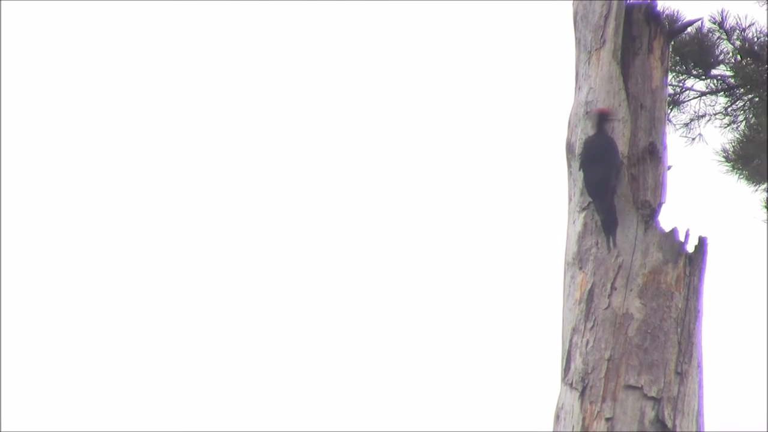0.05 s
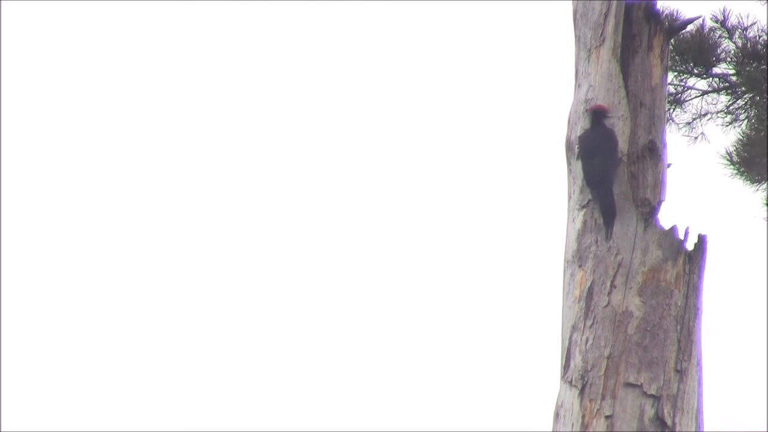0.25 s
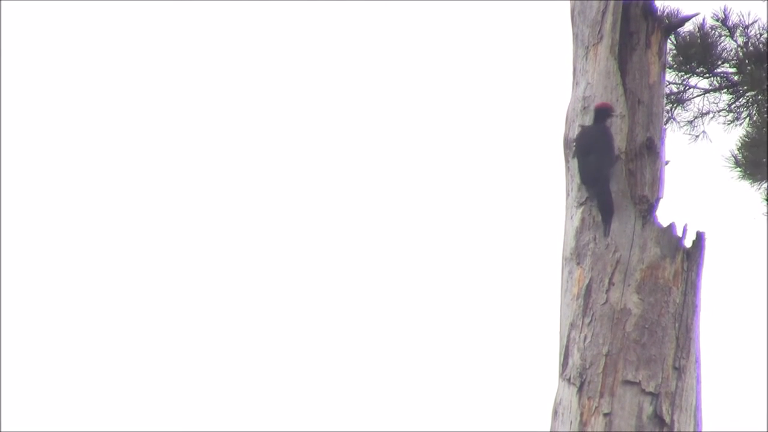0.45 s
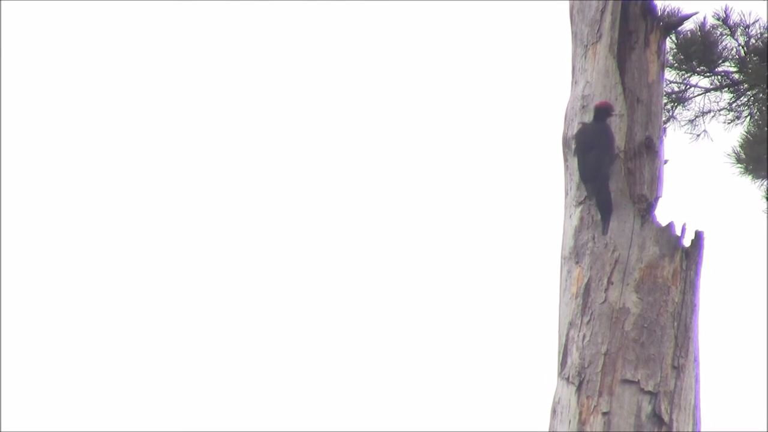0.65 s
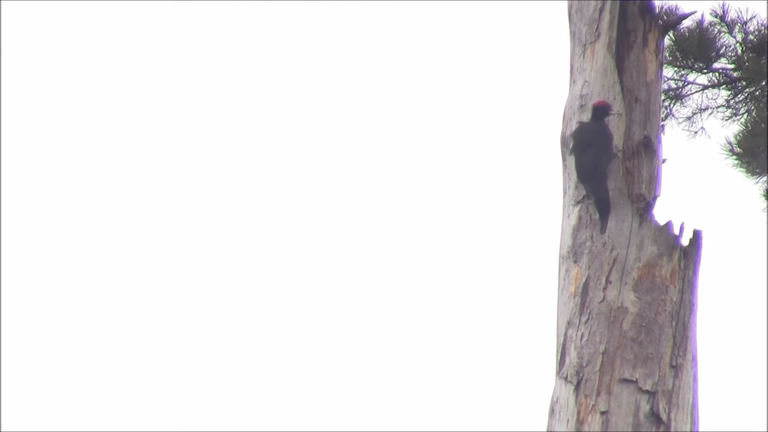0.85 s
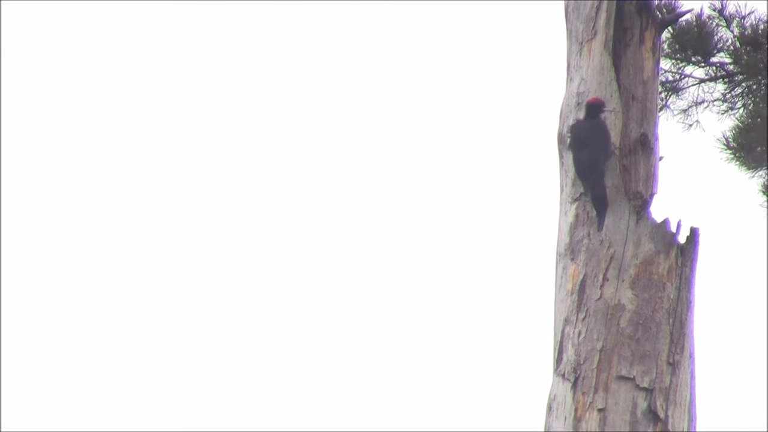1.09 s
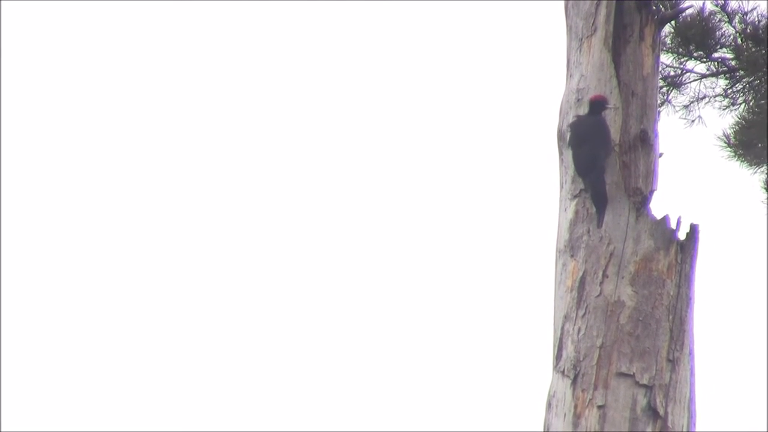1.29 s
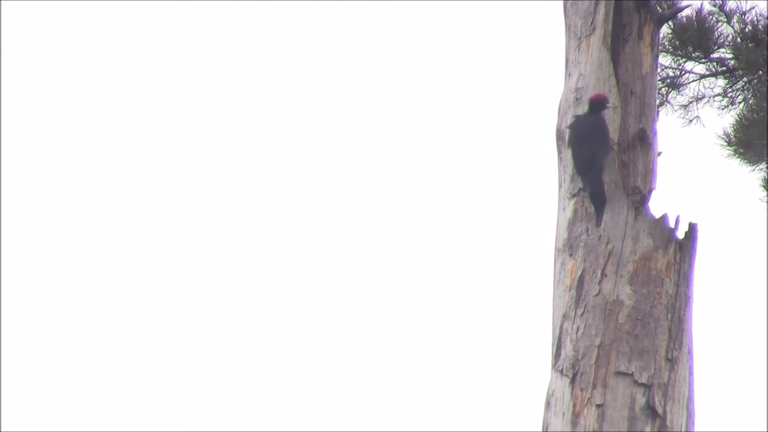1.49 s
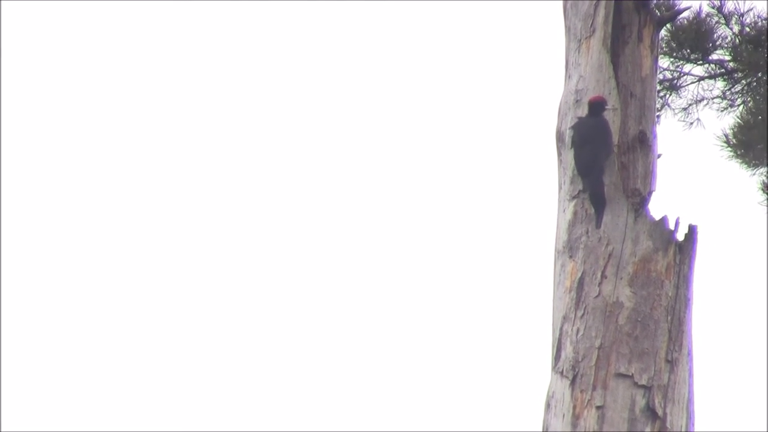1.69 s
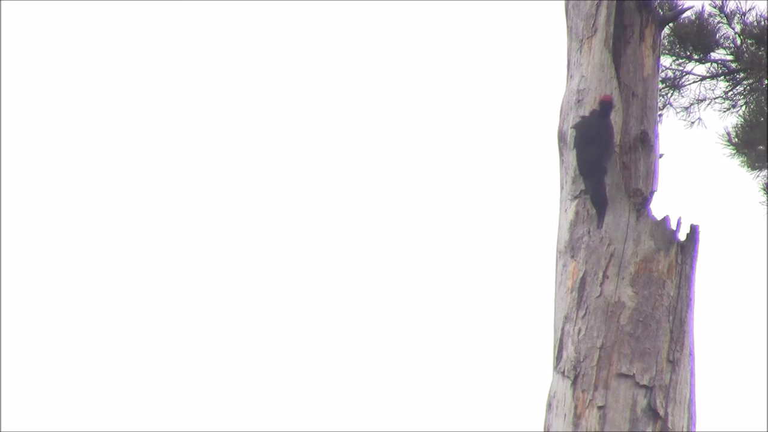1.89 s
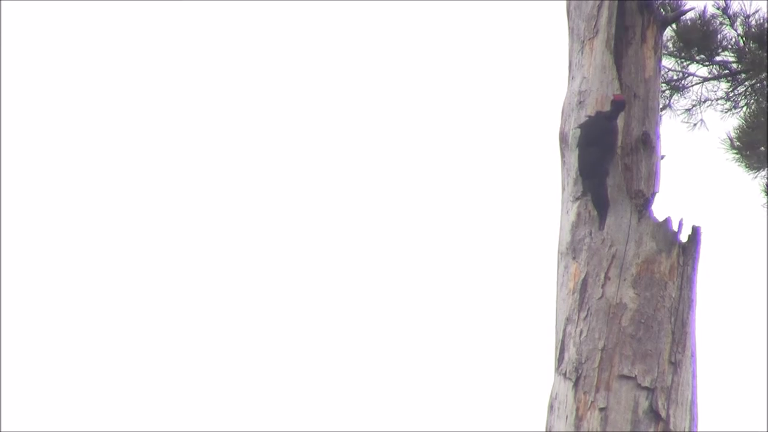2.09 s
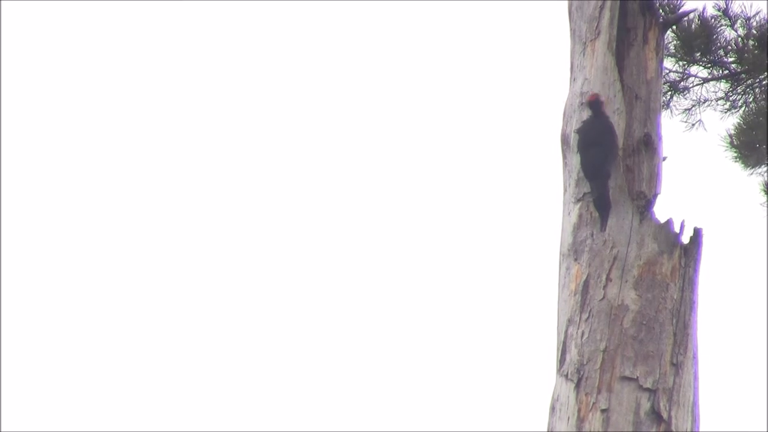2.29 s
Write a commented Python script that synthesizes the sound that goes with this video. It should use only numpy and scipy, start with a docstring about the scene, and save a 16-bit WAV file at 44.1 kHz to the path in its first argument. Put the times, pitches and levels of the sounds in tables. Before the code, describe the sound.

A woodpecker drums one rapid, fading roll on a hollow trunk, with light wind puffs.

```python
"""A woodpecker drums one roll on a dead, hollow trunk: each blow of its bill cracks on the surface
and makes the wood ring. The blows speed up and fade, and the trees echo them.
Gusts flap at the microphone in short, low puffs over a fluttering rumble.
One small tick follows the roll. Behind it all lie a faint forest hush and microphone hiss."""
import sys
import numpy as np
from scipy import signal
from scipy.fft import rfft, irfft, next_fast_len
from scipy.io import wavfile
from scipy.ndimage import uniform_filter1d, minimum_filter1d, map_coordinates

SR = 44100
rng = np.random.default_rng(int(sys.argv[2]) if len(sys.argv) > 2 else 0)


def unload_audio(sound):
    """Save the sound as a 16-bit wav file, at the path given as the first command line argument."""
    columns = np.transpose(np.atleast_2d(sound))
    # keep every value between -1 and 1, then stretch to whole-number steps
    steps = np.round(np.clip(columns, -1, 1) * 32767)
    wavfile.write(sys.argv[1], SR, steps.astype(np.int16))


N = 108045

# how alike the wind sounds left and right: pitch_hz, likeness (1 = the same, 0 = unrelated)
WIND_LIKENESS = [(40, .85), (120, .6), (300, .2)]


def woodpecker():
    """Each blow cracks on the surface and rings the trunk's own tones; the low ones start a bit later."""
    # blows of the bill: start_s, strength_db, hardness_db (extra level for high tones and the crack)
    blows = [(0.2148, -1, 0), (0.2969, -1.8, -3.5), (0.3764, -1, -5), (0.4519, 0.5, 1.8), (0.5275, 1.2, 6),
             (0.5998, 1.1, 2.5), (0.6698, 0.6, -0.2), (0.7388, -0.5, 2), (0.8062, -0.4, 0.8),
             (0.8738, -0.3, -1), (0.9397, 0, -0.5), (1.0061, 0.0, -3), (1.0714, -0.4, -3.5),
             (1.1369, -1.4, -5.5), (1.2009, -2.5, -3.5), (1.264, -2.5, 0), (1.3275, -2.5, -9.0),
             (1.3904, -3.5, -6), (1.4518, -5.5, -8.5), (1.5142, -6, -12), (1.5743, -7.3, -13),
             (1.6354, -7, -15), (1.6941, -9.5, -20), (1.7532, -11.5, -11), (1.8151, -23.1, -7.0),
             (1.8722, -12.5, -10)]
    # tones of the trunk: pitch_hz, level_db, ring_s (time to fall 60 dB), delay_s
    trunk_tones = [(258, -26, .062, .00423), (326, -17.5, .06, .00389), (416, -23, .09, .00437),
                   (583, -6, .023, .00226), (552, -6.5, .026, .0013), (602, -30.4, .1, .00349),
                   (756, -33, .08, .00682), (930, -30, .06, .00337), (881, -14, .023, 0),
                   (1149, -18, .016, .00361), (1355, -38, .06, .00325), (1813, -31, .015, .0003),
                   (2070, -46, .03, 0)]
    # tone colour of the crack: pitch_hz, level_db
    crack_colour = [(1000, -20), (1900, -1), (2300, -6), (2650, -1), (3300, -9.5), (3800, -2), (4400, -9),
                    (6000, -14), (9000, -26), (15000, -38)]
    build_cycles, hard_hz, crack_db = .7, 1800, -41
    out, t = np.zeros((2, N + SR)), np.arange(SR // 4) / SR
    grit = noise(crack_colour, likeness=[(1000, .85)])
    for start_s, strength_db, hardness_db in blows:
        start = round(start_s * SR)
        span = slice(start, start + len(t))
        ring = np.zeros(len(t))
        for hz, level_db, ring_s, delay_s in trunk_tones:
            age = np.maximum(t - delay_s, 0)
            build = 1 - np.exp(-age * hz / build_cycles)
            gain = amp(level_db + hardness_db * min(hz / hard_hz, 1) ** 4)
            ring += gain * build * fade(age, ring_s) * np.sin(2 * np.pi * hz * age)
        crack = amp(crack_db + .7 * hardness_db) * fade(t, ring_s=.018) * grit[:, span]
        out[:, span] += amp(strength_db) * (ring + crack)
    bass_cut = [(85, -30), (170, -8), (238, 0)]  # pitch_hz, level_db
    return filtered(out[:, :N], lambda hz: amp(along(bass_cut, hz)))


def forest_echo(sound):
    """The trees scatter the sound into a wash of echoes; the treble dies first."""
    # how long the echoes take to fall 60 dB: pitch_hz, ring_s
    ring_times = [(250, .7), (600, .9), (1200, .75), (2500, .4), (8000, .2)]
    # tone colour of the echoes: pitch_hz, level_db
    colour = [(150, 8), (320, -7), (550, 1), (1000, 0), (1300, -3), (1700, 0), (2600, -2), (6000, -7)]
    # how alike the echoes are left and right: pitch_hz, likeness
    likeness = [(300, .9), (700, .8), (1500, .5), (4000, .2)]
    echo_db, rise_s = -10, .015  # the level is relative to the direct sound
    white = noise([(1000, 0)], likeness)[:, :SR]
    hz, t, bands = signal.stft(white, SR, nperseg=256)
    shape = fade(t, along(ring_times, hz)[:, None]) * (1 - np.exp(-t / rise_s))
    tail = signal.istft(bands * shape, SR)[1]
    echo = signal.fftconvolve(sound.mean(axis=0)[None], tail, axes=1)[:, :N]
    echo = filtered(echo, lambda hz: amp(along(colour, hz)))
    return amp(echo_db) * np.std(sound) * unit(echo)


def wind_puffs():
    """Each swirl of air passes one side of the microphone, then the other: a brief pressure swing."""
    # swirls: time_s (at the peak), level_db (before boost_db), pitch_hz (before pitch_scale),
    # left_louder_db, left_earlier_s
    puffs = [(0.617, -21, 320, 0, -0.0002), (0.795, -23, 210, -2, 0.0004), (0.878, -12, 320, 5, 0.0009),
             (0.886, -13, 370, -1, -0.001), (0.893, -8, 350, 9, 0.0003), (0.909, -20, 230, 5, 0.0021),
             (0.926, -24, 190, 5, -0.0015), (1.033, -8, 220, -9, 0.0015), (1.045, -15.5, 250, 1, 0.0012),
             (1.075, -10.5, 300, 3, -0.0011), (1.127, -13, 280, -3, -0.0011),
             (1.157, -5, 230, 0.5, -0.0008), (1.219, -18, 220, 6, -0.0009), (1.393, -15.5, 310, -2, 0.0008),
             (1.406, -20, 240, -2, 0.0004), (1.432, -14.5, 200, 4, -0.001), (1.494, -15.5, 260, -1, 0.0011),
             (1.506, -16, 190, -1, -0.001), (1.708, -15, 270, -3.5, -0.0005), (1.715, -16, 320, 4, 0.0013),
             (1.735, -13, 220, -1, 0.0002), (1.743, -17, 290, 0, 0.0012), (1.788, -19, 200, 1, -0.0011),
             (1.83, -16.5, 270, -1, -0.0009), (1.849, -13, 250, -2, -0.0012), (1.902, -12, 330, -5, -0.001),
             (1.913, -13, 240, 0, -0.001), (1.94, -19, 190, 2, -0.0009), (1.961, -19, 260, 0, -0.0017),
             (1.977, -13.5, 330, -2, -0.0009), (2.055, -8, 230, -1, 0.001), (2.061, 0, 280, 3, -0.0003),
             (2.075, -5, 250, 0, -0.0013), (2.081, -3, 250, -5, -0.0015), (2.091, -7, 250, -1, -0.001),
             (2.125, -6.5, 260, -1, -0.0009), (2.141, -3.5, 260, -1, -0.0008),
             (2.169, -12, 190, -8, 0.0001), (2.183, -9.5, 220, 1, -0.0011), (2.343, -23, 220, -3, 0.0011)]
    # tone colour of the churning air inside a puff: pitch_hz, level_db
    churn_colour = [(50, -12), (100, -2), (200, -3), (400, 0), (600, -6), (850, -20), (1200, -38),
                    (2000, -60), (4000, -90)]
    boost_db, pitch_scale, width_cycles = 1, .92, .6
    out, half, sides = np.zeros((2, N)), SR // 40, np.array([[1], [-1]])
    churn = amp(-15) * noise(churn_colour, WIND_LIKENESS)
    for time_s, level_db, hz, left_louder_db, left_earlier_s in puffs:
        span = round(time_s * SR) + np.arange(-half, half)
        t = span / SR - time_s
        cycles = (t + sides * left_earlier_s / 2) * hz * pitch_scale
        swell = 1 / np.cosh(np.clip(cycles * 2 / width_cycles, -20, 20))
        swing = np.cos(2 * np.pi * cycles + rng.uniform(-np.pi, np.pi)) + churn[:, span]
        balance = unit(amp(sides * left_louder_db / 2))
        out[:, span] += amp(level_db + boost_db) * balance * swell * swing
    return signal.sosfilt(signal.butter(2, 80, "high", fs=SR, output="sos"), out)


def wind_rumble():
    """Wind on the microphone makes a low, fluttering noise that follows the gusts."""
    # rise and fall of the gusts: time_s, level_db (before boost_db and the flutter)
    gusts = [(0.0, -70), (0.23, -72), (0.39, -74), (0.57, -58.5), (0.73, -54), (0.88, -44), (1.03, -43),
             (1.17, -41), (1.31, -47.5), (1.48, -34.5), (1.6, -43.5), (1.77, -39.5), (1.91, -36),
             (1.96, -30.5), (2.24, -41.5), (2.42, -45.5)]
    # tone colour of the rumble: pitch_hz, level_db
    colour = [(20, -32), (40, -24.5), (80, -4.5), (150, 0.5), (250, -3), (400, -12.5), (700, -29),
              (1500, -54), (4000, -78)]
    boost_db, flutter_db, flutters_per_s = 2, 2.2, 35
    t = np.arange(N) / SR
    flutter = map_coordinates(rng.standard_normal(N // 100), [t * flutters_per_s])  # smooth and random
    level_db = np.interp(t, *np.transpose(gusts)) + boost_db + flutter_db * flutter
    return amp(level_db) * noise(colour, WIND_LIKENESS)


def tick():
    """One faint, dry tick: a burst of noise that dies at once."""
    # tone colour of the tick: pitch_hz, level_db
    colour = [(300, -7), (1200, 2), (2500, -2), (4000, -17), (6000, -7), (8000, -12), (12000, -25)]
    age = np.arange(N) / SR - 2.2025
    return amp(-39) * fade(age, ring_s=.015) * noise(colour, likeness=[(1000, .4)])


def forest_hush():
    """The soft, steady noise of the forest."""
    # tone colour of the hush: pitch_hz, level_db
    colour = [(30, -45), (100, -36), (180, -26), (290, -9), (460, 2.5), (700, -6), (1150, -9), (1800, -17),
              (2600, -28), (5000, -45)]
    # how alike the hush is left and right: pitch_hz, likeness
    likeness = [(130, .85), (640, .75), (1400, .4), (3000, .2)]
    return amp(-47.5) * noise(colour, likeness)


def microphone_hiss():
    """The microphone's own faint, even noise."""
    # tone colour of the hiss: pitch_hz, level_db
    colour = [(100, -3), (2000, 0), (3400, 0), (4700, 1), (5700, -1.5), (7500, -1), (9000, -5),
              (15500, -7.5)]
    # how alike the hiss is left and right: pitch_hz, likeness
    likeness = [(3000, .2), (7000, .2), (10000, -.05)]
    return amp(-54) * noise(colour, likeness)


def amp(db):
    """Turn decibels into a number to multiply by."""
    return 10 ** (np.asarray(db) / 20)


def unit(x):
    """Scale to an average (rms) level of 1."""
    return x / np.sqrt(np.mean(x ** 2) + 1e-20)


def along(points, hz):
    """Read between (pitch_hz, value) points, with octaves evenly spaced."""
    pitches, values = np.transpose(points)
    return np.interp(np.log(hz + 1), np.log(pitches + 1), values)


def filtered(x, response):
    """Turn each pitch up or down by the gain response(hz)."""
    size = next_fast_len(N + SR // 2)
    return irfft(rfft(x, size) * response(np.fft.rfftfreq(size, 1 / SR)), size)[..., :N]


def noise(colour, likeness):
    """Stereo noise of level 1 with a given tone colour and left-right likeness."""
    def response(hz):
        spread = np.arccos(np.clip(along(likeness, hz), -1, 1)) / 2
        return amp(along(colour, hz)) * [np.cos(spread), np.sin(spread)]
    mid, side = filtered(rng.standard_normal((2, N)), response)
    return unit(np.array([mid + side, mid - side]))


def fade(t, ring_s):
    """Silent before t = 0, then falling 60 dB every ring_s seconds."""
    return (t >= 0) * amp(-60 * np.maximum(t, 0) / ring_s)


def scene():
    """The roll and its echo slightly to the right, with the wind, the tick and the background."""
    roll = woodpecker()
    bird = (roll + forest_echo(roll)) * amp([[-.6], [.6]])
    return bird + wind_puffs() + wind_rumble() + tick() + forest_hush() + microphone_hiss()


def record(dry):
    """A fast limiter turns down any peak near full scale; the very highest treble is cut off."""
    ceiling, top_hz = amp(-.5), 15800
    needed = ceiling / np.maximum(np.abs(dry).max(axis=0), ceiling)
    gain = uniform_filter1d(minimum_filter1d(needed, size=300), size=200)
    return filtered(dry * gain, lambda hz: hz < top_hz)


dry = scene()
out = record(dry)
unload_audio(out)
```